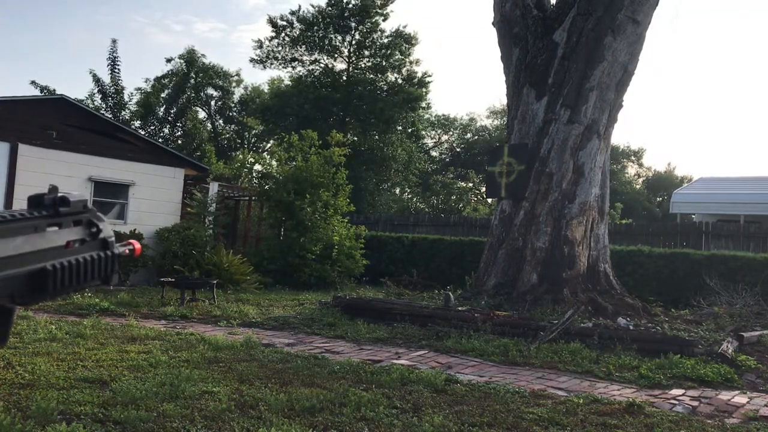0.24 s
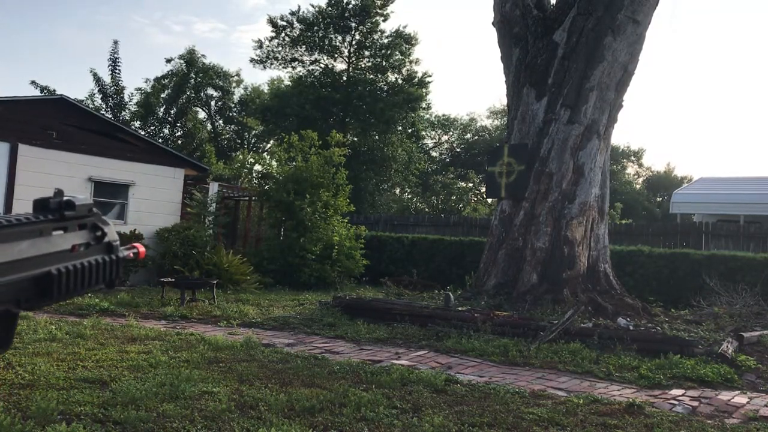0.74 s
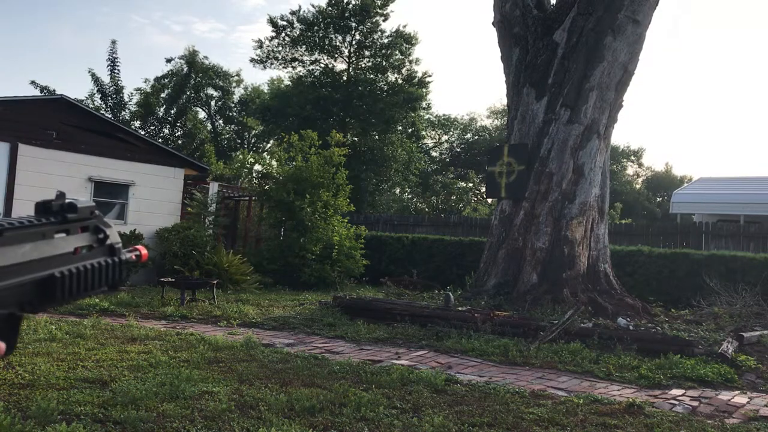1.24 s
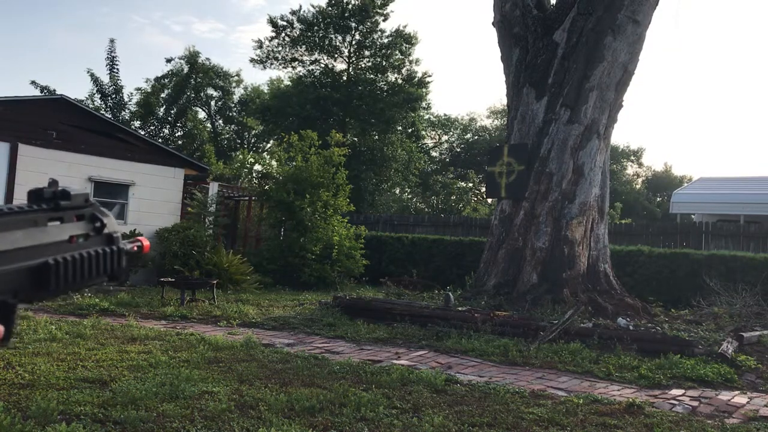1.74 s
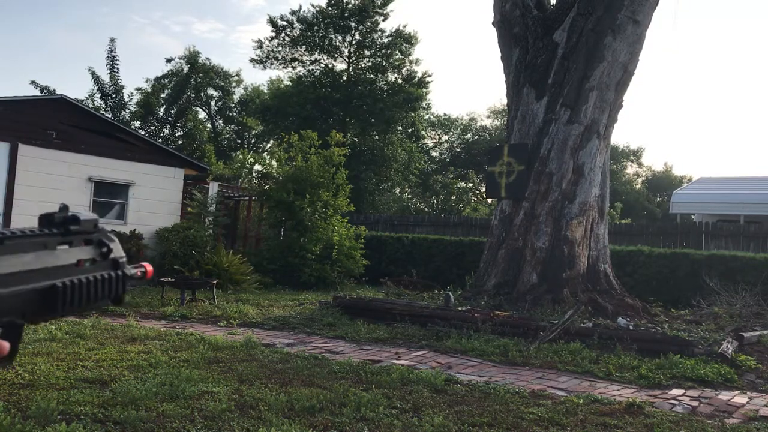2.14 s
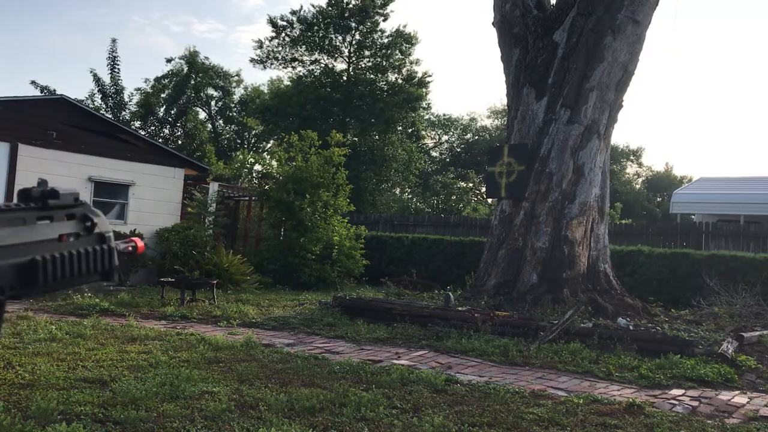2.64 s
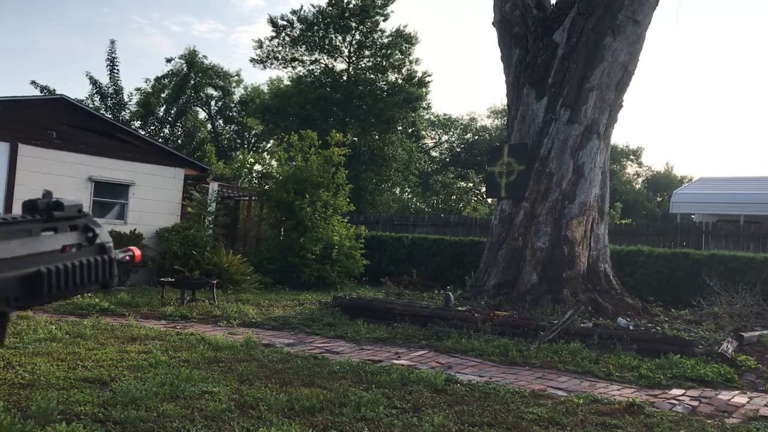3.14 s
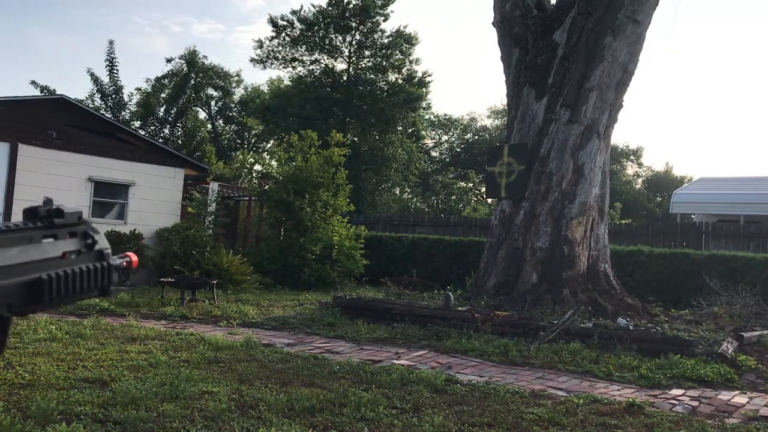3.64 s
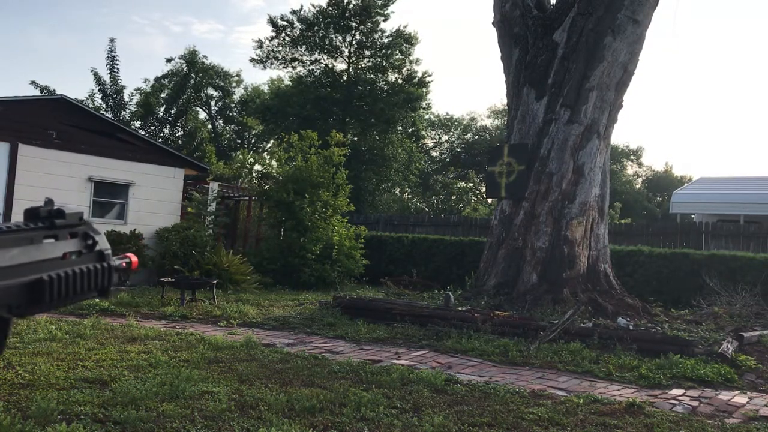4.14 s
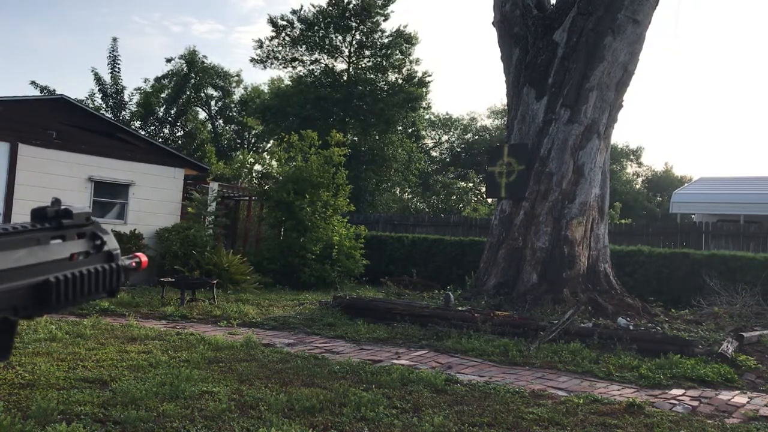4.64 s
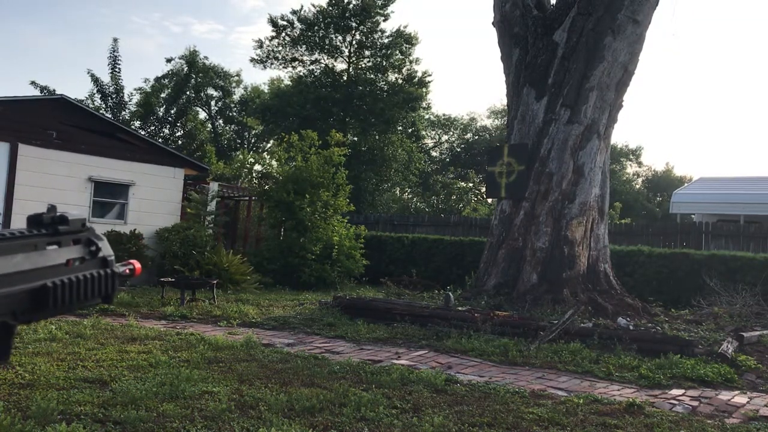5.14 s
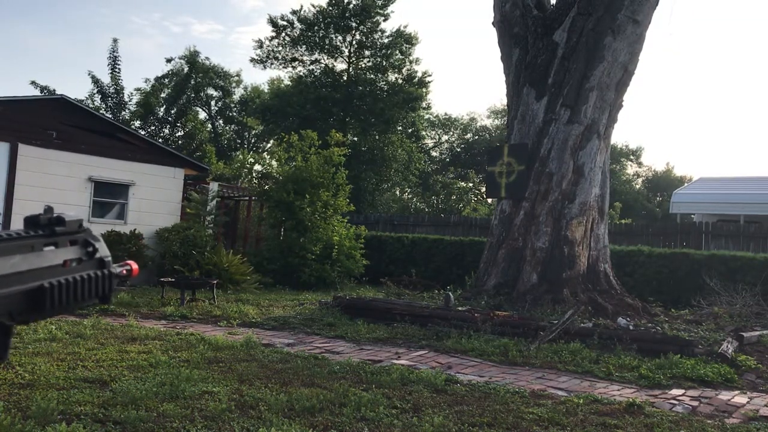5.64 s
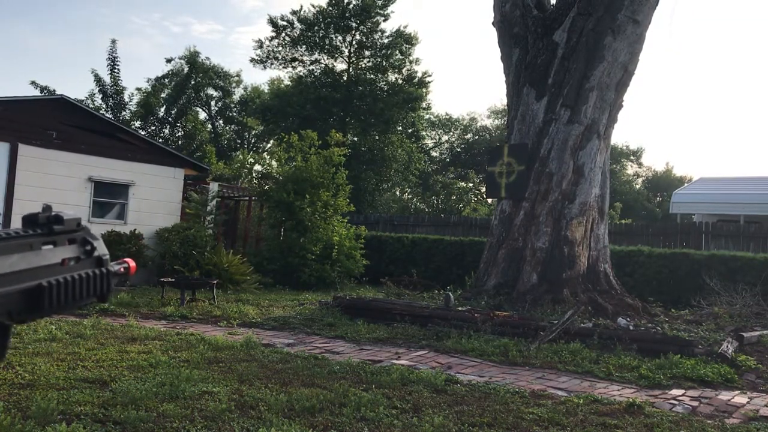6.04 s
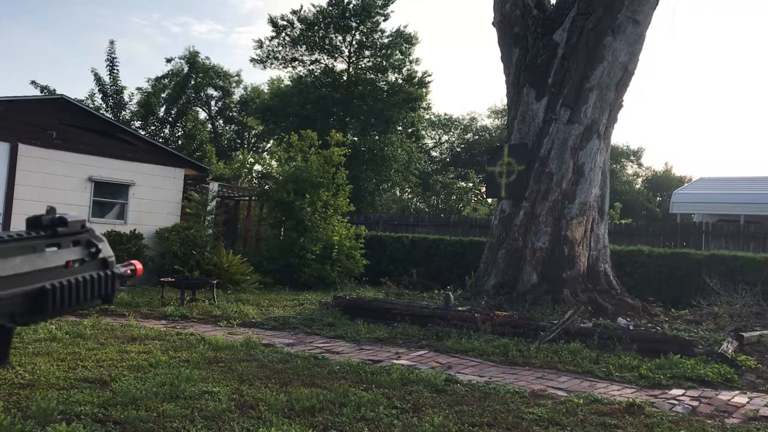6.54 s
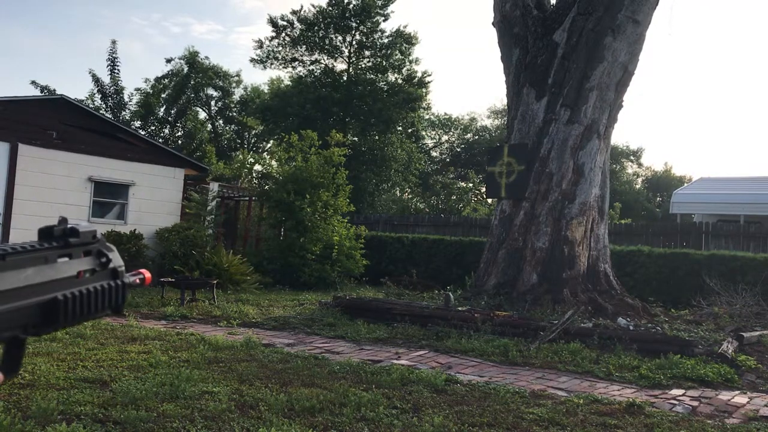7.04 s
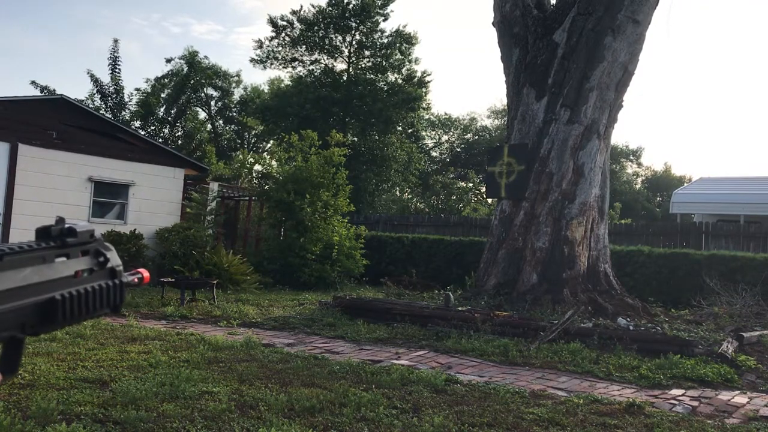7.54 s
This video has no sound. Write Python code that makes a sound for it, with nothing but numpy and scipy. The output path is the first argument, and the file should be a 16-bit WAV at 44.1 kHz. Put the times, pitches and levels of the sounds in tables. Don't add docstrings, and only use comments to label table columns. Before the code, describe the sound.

Rapid but countable hard clacks, each with a gear whine sagging in pitch, a piston slam, a small air pop and a snapping lever. The first burst soon coasts to a stop; a quiet gap holds plastic taps, soft wind puffs and very faint birds. Then the motor kicks in and the clacking continues until the end. Close phone microphone outdoors, loudest peaks slightly clipped.

```python
import sys
import numpy as np
from scipy import signal
from scipy.fft import rfft, irfft
from scipy.io import wavfile
from scipy.ndimage import uniform_filter1d

SR = 44100
rng = np.random.default_rng(int(sys.argv[2]) if len(sys.argv) > 2 else 0)


def voltage_ratio(decibels):
    exponent = np.asarray(decibels, float) / 20
    return 10 ** exponent


def wav_out(sig):
    wavfile.write(sys.argv[1], SR, np.round(np.clip(np.atleast_2d(sig).T, -1, 1) * 32767).astype(np.int16))


N = 343980


def unit(x):
    return x / np.sqrt(np.mean(x ** 2))


def band(x, lo_hz, hi_hz):
    return signal.sosfilt(signal.butter(3, [lo_hz, hi_hz], "band", fs=SR, output="sos"), x)


def ring(x, modes):
    out = 0
    for k, (hz, width_hz, db) in enumerate(modes):
        mode = signal.lfilter(*signal.iirpeak(hz, hz / width_hz, SR), x)
        out = out + (-1) ** k * voltage_ratio(db) * mode
    return out


def walk(rate_hz):
    hold = int(SR / rate_hz)
    steps = np.repeat(rng.standard_normal(N // hold + 1), hold)
    return unit(uniform_filter1d(steps, hold)[:N])


def swells(t, table, floor_db):
    return voltage_ratio(floor_db) + sum(voltage_ratio(db) * np.exp(-((t - s) / half_s) ** 2) for s, db, half_s in table)


def puffs(times_s, db, hz):
    push = np.zeros(N)
    push[(times_s * SR).astype(int)] = voltage_ratio(db)
    cycle = np.arange(int(SR / hz)) * hz / SR
    swing = np.sin(2 * np.pi * cycle) * np.sqrt(np.sin(np.pi * cycle))
    return np.convolve(push, swing)[:N]


def strike(times_s, db, modes, decay_ms, same):
    t = np.arange(512) / SR
    shape = same * rng.standard_normal(512) + (1 - same) * rng.standard_normal((len(times_s), 512))
    hits = ring(shape * np.exp(-t * 1000 / decay_ms), modes)
    hits /= np.sqrt(np.mean(hits[:, :64] ** 2, axis=1, keepdims=True))
    out = np.zeros(N + 1024)
    for s, gain, hit in zip(times_s, voltage_ratio(db), hits):
        start = int(s * SR)
        out[start:start + 512] += gain * hit
    return out[:N]


# (frequency [Hz], width [Hz], level [dB])
EDGE_MODES = [(7580, 2200, -2.5), (9290, 1100, 1), (12160, 1600, 0), (15350, 1600, -6)]
# (frequency [Hz], width [Hz], level [dB])
KNOCK_MODES = [(1095, 330, -4), (1886, 310, -3.5)]


def clicks(table, body, decay_ms, db, knock_ms=0.52):
    s, level_db, bright_db, *knock_db = np.transpose(table)
    out = strike(s, level_db + db, body, decay_ms, same=0.38)
    out += strike(s, level_db + bright_db + db, EDGE_MODES, 1.1 * decay_ms, same=0.11)
    if knock_db:
        out += strike(s, knock_db[0] + 0.5, KNOCK_MODES, knock_ms, same=0.19)
    return out


# (frequency [Hz], density [dB per Hz])
GARDEN_SPECTRUM = [(88, -33.5), (150, 3), (186, -14), (484, -16.5), (745, -7.5), (1080, -6.5), (2310, -18),
                   (3350, -22), (3700, -28), (6510, -31), (10400, -45.5), (15100, -36), (16000, -47.5)]


def far_traffic():
    hz, db = np.transpose(GARDEN_SPECTRUM)
    bins_hz = np.arange(N // 2 + 1) * SR / N
    colour = voltage_ratio(np.interp(np.log(bins_hz + 1), np.log(hz), db))
    noise = unit(irfft(rfft(rng.standard_normal(N)) * colour, N))
    return noise * voltage_ratio(-58 + 2.0 + 1.1 * walk(9.9))


def thin_hiss(t):
    end_s, fade_s = 1.69, .01
    hiss = unit(band(rng.standard_normal(N), 2200, 16000))
    return voltage_ratio(-67) * hiss * np.clip((end_s - t) / fade_s, 0, 1)


# (time [s], level [dB], half length [s])
GUSTS_ON_MIC = [
    (.15, -47, .15),
    (.7, -52, 0.19),
    (1.5, -48, 0.054),
    (1.734, -55.5, 0.037),
    (1.852, -54, 0.046),
    (2.049, -49, 0.036),
    (2.305, -59, .08),
    (2.667, -48, 0.025),
    (2.92, -58.5, .05),
]


def wind(t):
    mic_modes = [(55, 87, 5.5), (112.8, 100, -11.5), (153.5, 50, -12.5)]  # Hz, width Hz, dB
    buffet = ring(ring(rng.standard_normal(N), mic_modes), [(80, 106, 0)])
    return unit(buffet) * swells(t, GUSTS_ON_MIC, floor_db=-54)


# (time [s], slam level [dB], muzzle pop level [dB])
LOADED_STROKES = [(0.1193, -10.4, -15.3), (0.3948, -10.5, -15.2), (3.1841, -11.2, -15.1),
                  (3.4578, -12.1, -15.8), (3.5951, -11.2, -15.3), (3.7314, -9.5, -14.1),
                  (3.8685, -10.3, -13.8), (4.0053, -10.7, -16.2), (4.1415, -10.0, -12.8),
                  (4.2782, -9.1, -14.1), (4.4157, -9.4, -13.1), (4.6895, -11.0, -14.7),
                  (4.8275, -10.9, -15.8), (5.1026, -12.1, -16.2), (5.2402, -8.1, -15.2),
                  (5.515, -10.7, -14.2), (5.7892, -10.6, -14.6), (5.9281, -10.3, -13.2),
                  (6.0662, -11.4, -15.1), (6.3446, -11.2, -15.3), (6.4851, -12.2, -13.9),
                  (6.7711, -9.7, -11.7), (6.9114, -9.6, -13.6), (7.1972, -10.1, -14.8),
                  (7.4814, -9.7, -14.1), (7.7692, -10.5, -15.6)]
# (time [s], slam level [dB], stock boom level [dB])
EMPTY_STROKES = [(0.2565, -10.1, -31.4), (0.534, -10.3, -24.5), (0.671, -10.6, -24.9),
                 (0.8061, -9.6, -24.0), (0.9408, -9.2, -24.2), (1.0751, -9.4, -23.9),
                 (1.2091, -10.8, -24.6), (3.0451, -10.1, -23.8), (3.3217, -8.5, -27.0),
                 (4.5526, -10.0, -30.5), (4.9658, -9.0, -31.5), (5.3778, -9.8, -31.4),
                 (5.6528, -10.2, -31.3), (6.2049, -9.4, -27.7), (6.6267, -8.7, -31.0),
                 (7.0541, -10.0, -23.9), (7.3391, -10.4, -30.8), (7.6251, -10.1, -31.5)]


def strokes():
    rows = np.array(LOADED_STROKES + EMPTY_STROKES)
    order = np.argsort(rows[:, 0])
    return (*rows[order].T, order < len(LOADED_STROKES))


def motor(t):
    release_s, brake_s, coast_s, halt_s = 1.312, 0.021, 0.092, .02
    pull_s, spin_up_s = 2.995, 0.055
    brake_db, coast_db, rest_db, kick_db = -18.5, -41, -70, -9
    stop = release_s + np.cumsum([0, brake_s, coast_s, halt_s])
    start = pull_s + np.array([-.001, .002, spin_up_s])
    return voltage_ratio(np.interp(t, [*stop, *start], [0, brake_db, coast_db, rest_db, rest_db, kick_db, 0]))


# (time [s], whine level [dB])
GRIP_DAMPING = [(0, -26.5), (.3, -25.5), (1.3, -27), (3, -25), (5.5, -25), (6.5, -25.5), (6.8, -27.5),
                (7.2, -25), (7.8, -26)]
# (share of cycle [0-1], rate [Hz])
TOOTH_RATE_CURVE = [(0, 1215), (.195, 2040), (.3, 1950), (.45, 1705), (.55, 1640), (.7, 1540), (.8, 1432),
                    (.9, 1295), (1, 1215)]
# (rate [Hz], level [dB])
HOUSING_RESPONSE = [(1230, -9), (1300, -11), (1385, -17), (1435, -6), (1490, -2), (1565, 1), (1650, -7),
                    (1800, -9), (1950, -16)]
# (share of cycle [0-1], level [dB])
BACKLASH_CURVE = [(0, -12), (.081, -7.5), (.17, -2), (.41, -1.5), (.582, -2), (.71, -3.5), (.878, -6),
                  (.949, -6), (1, 5)]
# (multiple [1], level [dB], unsteadiness [dB])
TOOTH_OVERTONES = [(2, -5, 2), (3, -5, 2.6), (4, -13, 3)]
# (frequency [Hz], width [Hz], level [dB])
GEAR_MODES = [(3100, 700, 0), (3900, 350, -3), (4540, 520, 1.5), (6100, 600, -4)]
# (frequency [Hz], width [Hz], level [dB])
HOUSING_MODES = [(978, 144, 0.5), (1222, 203, 2), (1616, 210, 4), (1820, 460, 0.5), (3000, 800, 1),
                 (4446, 660, 1.5), (6160, 930, -6.5), (7830, 2500, -11.5), (11850, 630, -13),
                 (13900, 2100, -15)]


def gearbox(t):
    s, _, _, loaded = strokes()
    grip_db = np.interp(s, *np.transpose(GRIP_DAMPING)) - 1.5 * ~loaded

    k = np.clip(np.searchsorted(s, t) - 1, -1, len(s) - 1)
    gaps_s = np.diff(s, append=s[-1] + .14)
    since_s = np.where(k < 0, t - s[0] + .137, t - s[k])
    until_s = np.append(s, 9.)[k + 1] - t
    winding_up = (gaps_s[k] > .5) & (until_s < .137)
    running = np.clip(since_s / np.minimum(gaps_s[k], .145), 0, 1)
    share = np.where(winding_up, 1 - until_s / .2, running)

    pace = .1372 / np.clip(np.append(gaps_s, .137)[k], .135, .145)
    hz = np.interp(share, *np.transpose(TOOTH_RATE_CURVE)) * pace ** 1.6

    mesh_at, let_go_at, loose_db = 0.16, 1, -20
    mesh_db = np.interp(share, [0, mesh_at, mesh_at + 0.019, let_go_at, 1],
                        [2 * loose_db, loose_db, 0, 0, loose_db])
    over_from_hz, over_to_hz = 1628, 1443
    below = np.clip((over_to_hz - hz) / 30, 0, 1)
    above = np.clip((hz - over_from_hz) / 120, 0, 1.5)
    slack_db = -6 * (below + above)
    tires_s, labour_db_per_s = 5.5, 8
    tone_db = np.interp(hz, *np.transpose(HOUSING_RESPONSE))
    tone_db += np.clip(labour_db_per_s * (t - tires_s), 0, 5) * below
    rattle_db = np.interp(share, *np.transpose(BACKLASH_CURVE))
    treble_db = 2 * rattle_db + 2.5
    shake_share = 0.044
    rumble_db = -14 * share - .6 + 24 * np.exp((share - 1) / shake_share)
    rumble_db += 6 * np.exp(-share / shake_share)

    phase = 2 * np.pi * np.cumsum(hz * (1 + 0.00402 * walk(200))) / SR
    turn = phase / 13
    teeth = 0
    for m, db, rough_db in TOOTH_OVERTONES:
        gain = voltage_ratio(db + rough_db * walk(220) + slack_db)
        teeth = teeth + gain * np.sin(m * (phase + .25 * walk(350)))
    teeth = teeth * (1 + 0.43 * np.sin(turn))
    tone = voltage_ratio(tone_db + 1.2 * walk(150)) * np.sin(phase) * (1 + 0.33 * np.sin(turn))
    whine = voltage_ratio(0.5) * ring(ring(teeth, GEAR_MODES), GEAR_MODES) + tone

    grit = rng.standard_normal(N) * voltage_ratio(2.37 * walk(400)) * (1 + 0.33 * np.cos(phase))
    beat = rng.standard_normal(N) * np.exp(3.0 * (np.cos(turn) - 1))
    low = unit(band(ring(grit, HOUSING_MODES[:7]), 1000, 6460))
    high = unit(band(ring(grit, HOUSING_MODES[7:]), 5800, 21000))
    beat_high = unit(band(ring(beat, HOUSING_MODES[8:]), 10500, 16000))
    rumble = unit(band(grit, 206, 720)) + voltage_ratio(3.5) * unit(band(grit, 400, 850))
    rattle = voltage_ratio(-23.5 + rattle_db) * low + voltage_ratio(-36.5 + treble_db) * high
    rattle += voltage_ratio(-44.5) * beat_high + voltage_ratio(-40.5 + rumble_db) * rumble
    return motor(t) * (voltage_ratio(mesh_db + grip_db[np.maximum(k, 0)] + 4.5) * whine + rattle)


# (time [s], level [dB])
LEVER_SNAPS = [
    (0.05, -5.5),
    (0.3233, -7.5),
    (0.4647, -7.5),
    (0.605, -9),
    (0.7413, -9.5),
    (0.8754, -8.5),
    (1.0084, -9),
    (1.1437, -8.5),
    (1.277, -9),
               (3.1142, -6), (3.3885, -6.5), (3.5259, -7), (3.6634, -7), (3.7992, -8), (3.938, -6.5),
                 (4.073, -10.5), (4.2096, -7), (4.347, -9), (4.6201, -8), (4.7572, -7), (5.0337, -9),
                 (5.1704, -6.5), (5.444, -6.5), (5.721, -9.5), (5.857, -7.5), (5.997, -8), (6.141, -14.5),
                 (6.2731, -6), (6.4133, -7), (6.6961, -6.5), (6.839, -6.5), (7.1244, -9.5), (7.409, -8.5),
                 (7.6946, -8.5)]
# (time [s], level [dB])
NOZZLE_TICKS = [(0.274, -17), (0.553, -17.5), (3.753, -16), (3.8866, -13), (4.0203, -13), (4.2945, -21.5),
                (4.4355, -17), (4.9853, -15), (5.2566, -13), (5.4007, -15), (5.6706, -16.5), (5.9493, -10),
                (6.0852, -17), (6.2262, -17), (6.5083, -16.5), (6.642, -17), (7.0692, -17.5),
                (7.353, -13.5), (7.6373, -15.5)]
# (time [s], level [dB])
BRIGHT_TICKS = [(.0011, -15), (.0344, -22), (0.1856, -21), (1.3181, -34), (3.0343, -28), (3.0778, -24),
                (3.2523, -19), (3.6122, -20), (3.9315, -16), (4.161, -24), (4.4923, -20), (4.571, -21),
                (4.8416, -24), (5.0176, -20), (5.3071, -18), (5.6335, -26), (5.9778, -25),
                (6.5541, -22), (6.9702, -21), (6.9797, -20), (7.2659, -19), (7.3721, -22),
                (7.5508, -19)]
# (time [s], level [dB])
PELLET_TICKS = [(0.3074, -8), (3.0158, -28), (3.2149, -22), (3.275, -1), (4.5823, -17), (4.6038, -6),
                (5.2863, -10), (5.4284, -7), (5.704, -6), (6.0981, -24), (6.992, 0.5), (7.392, -9),
                (7.6782, -14)]
# (time [s], level
# [dB])
DULL_KNOCKS = [(0.033, -16.5), (0.145, -21), (0.186, -12), (0.307, -12.5), (0.562, -19), (1.106, -27),
               (3.251, -15.5), (3.661, -18), (4.345, -17), (4.484, -15), (4.894, -15), (5.017, -17.5),
               (5.307, -13), (5.582, -13.5), (5.702, -18), (5.9555, -21), (6.412, -22), (6.553, -13),
               (6.98, -18.5), (7.265, -14), (7.55, -15), (7.679, -18.5), (.0498, -27), (.4222, -23.5),
               (0.463, -19.5), (0.7382, -15.5), (1.0074, -22.5), (1.1407, -13.5), (1.4172, -38),
               (4.3066, -20), (4.443, -24), (4.9909, -23), (5.4311, -21), (6.1354, -20), (6.5146, -25)]
# (frequency [Hz], width [Hz], level [dB])
LEVER_MODES = [(2750, 240, -12.5), (3870, 500, 0), (4440, 470, 1), (5740, 610, -4.5)]
# (frequency [Hz], width [Hz], level [dB])
LATCH_MODES = [(5250, 760, -7), (970, 230, -4.5)]
# (frequency [Hz], width [Hz], level [dB])
STOCK_MODES = [(250, 37.7, 8), (498, 32, -8), (620, 110, -8)]


def feed():
    s, db = np.transpose(LEVER_SNAPS)
    edge_db = -8 - (1 - 0.5) * db
    knock_db = -22.5 + 1.5 * rng.standard_normal(len(s))
    snaps = np.transpose([s, db, edge_db, knock_db])
    ticks = [(s, db, 7.5) for s, db in NOZZLE_TICKS + BRIGHT_TICKS]
    ticks += [(s, db, -5) for s, db in PELLET_TICKS]
    dull_s, dull_db = np.transpose(DULL_KNOCKS)
    dull = strike(dull_s, dull_db - 6, KNOCK_MODES[:1] + STOCK_MODES[2:], 2.44, same=0.57)
    caught_s = strokes()[0] + 0.029
    latch = strike(caught_s, 3 * rng.standard_normal(len(caught_s)) - 25, LATCH_MODES, 1.6, same=0.34)
    out = clicks(snaps, LEVER_MODES, 1.95, db=-4.5)
    return out + clicks(ticks, LEVER_MODES, 0.8, db=-12.0) + dull + latch


# (delay [ms], level [dB])
PISTON_REBOUNDS = [(-1.6, -17), (-.7, -14), (0, 1), (.5, -4), (.95, -1), (1.4, -4), (1.9, -3), (2.5, -1),
                   (3.2, -7), (3.9, -7), (4.5, -4), (5, -3), (5.7, -7), (6.4, -11), (7.6, -16)]
# (frequency [Hz], width [Hz], level [dB])
SHELL_MODES = [(1186, 79, 1), (1940, 197, -2), (2335, 370, -3), (2700, 260, 1.5), (3230, 87, 1),
               (3970, 960, -4), (5980, 350, -4), (6650, 340, -6.5), (9030, 1400, -11.5), (11730, 1000, -12),
               (15040, 2100, -23.5)]
# (frequency [Hz], width [Hz], level [dB])
BARREL_MODES = [(922, 124, -1.5), (1170, 157, -2.5), (1986, 450, -11.5)]
# (frequency [Hz], width [Hz], level [dB])
RECEIVER_MODES = [(485.4, 80.8, 1), (703, 89, -6.5)]


def piston():
    s, slam_db, pop_db, loaded = strokes()
    off_db = -60
    stock_db = pop_db
    thump_db = np.where(loaded, -35, -47 + 0.67 * (stock_db + 30))

    scatter_db = rng.standard_normal((len(s), len(PISTON_REBOUNDS)))
    slam = strike(s + .0039, np.where(loaded, pop_db, off_db), BARREL_MODES, 0.26, same=0.96)
    slam += strike(s + 0.00051, slam_db - np.where(loaded, 11.5, 3.5), BARREL_MODES, 0.26, same=0.61)
    for k, (ms, db) in enumerate(PISTON_REBOUNDS):
        late_db = np.where(loaded, pop_db + 17.0, -1.6 * (ms - 2.1)) * (ms > 2.2)
        hit_db = slam_db + db + late_db - 4.5 + scatter_db[:, k]
        slam += strike(s + ms / 1000, hit_db, SHELL_MODES, 0.1, same=0.64)

    air = puffs(s - .0030, np.where(loaded, -22.0, 1.1 * (stock_db + 28.5) - 27.5), hz=253.0)
    air += puffs(s + 0.00326, np.where(loaded, thump_db + 16.5, off_db), hz=329.0)
    air += puffs(s + 0.0016, np.where(loaded, off_db, 0.67 * (stock_db + 26.0) - 15.0), hz=476.0)
    air = band(air + voltage_ratio(-12.0) * ring(air, STOCK_MODES), 188, 2900)
    air += puffs(s - .001, thump_db + 8.0, hz=133.6)
    receiver_db = np.where(loaded, slam_db - 21.5, pop_db - 5.5)
    air += strike(s + 0.0011, receiver_db, RECEIVER_MODES, 1.3, same=1.0)

    crack = puffs(s - .0001, slam_db + 7, hz=5200.)
    crack += puffs(s + .0023, np.where(loaded, slam_db + 4, off_db), hz=2600.)
    crack += strike(s, slam_db - 11.5, EDGE_MODES, 0.13, same=0.35)
    return band(slam, 750, 18300) + air + crack


# (time [s], level [dB], brightness [dB], knock [dB])
TRIGGER_CLICKS = [
    (1.37, -22.5, -16, -28),
    (1.3978, -30, -25, -37),
    (1.7536, -41, 7.5, -42),
    (2.996, -16, -6.5, -24.5),
    (3.0157, -31, 3, -24),
    (3.0373, -22, -12, -30),
]
# (time [s], level [dB], knock [dB])
FINGER_TOUCHES = [(1.7091, -53, -54.5), (1.8815, -55.5, -57), (1.9, -58.5, -58), (1.9264, -50, -59),
                  (2.015, -52, -56), (2.1229, -54, -55), (2.1364, -39, -45), (2.1511, -58, -54),
                  (2.2307, -57, -55), (2.396, -28, -38), (2.4123, -53, -61), (2.4263, -28.5, -38),
                  (2.4437, -57, -63), (2.4547, -28.5, -37), (2.5233, -45.5, -37), (2.528, -36.5, -42),
                  (2.684, -44.5, -43), (2.7028, -57, -53), (2.7274, -50, -56), (2.7406, -24.5, -36),
                  (2.7538, -30.5, -36), (2.7713, -41, -40), (2.776, -32.5, -34), (2.8037, -52, -56),
                  (2.9248, -47, -52), (1.7222, -53, -62), (1.7962, -61, -63), (1.9383, -58, -64),
                  (2.0777, -57, -64), (2.4645, -54, -62), (2.5396, -59, -66), (2.6149, -60, -66),
                  (2.9194, -60, -54), (2.9401, -59, -64), (2.9875, -58, -62)]
# (frequency [Hz], width [Hz], level [dB])
PLASTIC_MODES = [(2420, 1100, -7.5), (4230, 1150, 3), (6560, 690, 1)]


def hands():
    fingers = [(s, db, -3.5 + 0.2 * (db + 33), knock_db) for s, db, knock_db in FINGER_TOUCHES]
    touch = np.array(TRIGGER_CLICKS + fingers)
    bounce = touch + [.0042, -28, 0, -11]
    return clicks(np.vstack([touch, bounce]), PLASTIC_MODES, 1.0, db=-1.5, knock_ms=1.75)


# (time [s], level [dB], half length [s])
RUSTLE_BRUSHES = [
    (1.735, -56, 0.018),
    (2, -65, .02),
    (2.231, -59.5, 0.07),
]


def rustle(t):
    hiss = unit(ring(rng.standard_normal(N), [(6300, 2900, 1.5), (12500, 6000, -9.5)]))
    return hiss * swells(t, RUSTLE_BRUSHES, floor_db=-78) * voltage_ratio(-4.0)


# (time [s], length [s], start [Hz], end [Hz], level [dB])
BIRD_WHISTLES = [
    (2.28, .1, 3520, 3480, -72),
    (2.6, 0.049, 7800, 8200, -76.5),
]


def birds(t):
    out = 0
    for s, length_s, from_hz, to_hz, db in BIRD_WHISTLES:
        share = np.clip((t - s) / length_s, 0, 1)
        hz = from_hz + (to_hz - from_hz) * share
        out = out + voltage_ratio(db) * np.sin(np.pi * share) * np.sin(2 * np.pi * np.cumsum(hz) / SR)
    return out


def scene():
    t = np.arange(N) / SR
    garden = far_traffic() + thin_hiss(t) + wind(t) + rustle(t) + birds(t)
    gun = gearbox(t) + feed() + piston() + hands()
    dip_hz, dip_width_hz = 775.5, 47
    gun = signal.lfilter(*signal.iirnotch(dip_hz, dip_hz / dip_width_hz, SR), gun)
    lag_s = np.arange(SR // 5) / SR
    near, far = rng.standard_normal((2, len(lag_s)))
    near = voltage_ratio(-32.5) * near * np.exp(-lag_s / 0.0058) * (lag_s > .001)
    far = voltage_ratio(-55) * band(far, 300, 5000) * np.exp(-lag_s / .04) * np.clip(lag_s / .015, 0, 1)
    return (gun + signal.fftconvolve(gun, near + far)[:N] + garden)[None]


def top_cut(x):
    return signal.sosfilt(signal.butter(12, 16960, fs=SR, output="sos"), x)


def record(dry):
    x = signal.sosfilt(signal.ellip(10, .5, 24, 15800, fs=SR, output="sos"), dry)
    x = signal.sosfilt(signal.butter(2, 45, "high", fs=SR, output="sos"), x)
    return top_cut(np.clip(x, -1, 1))


dry = scene()
out = record(dry)
wav_out(out)
```